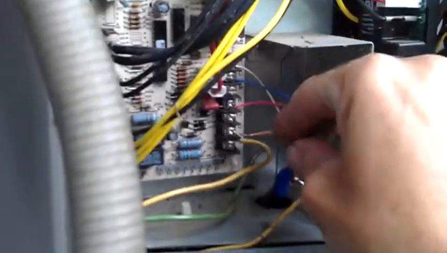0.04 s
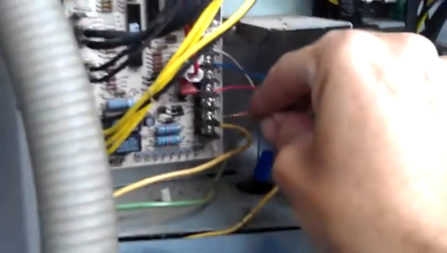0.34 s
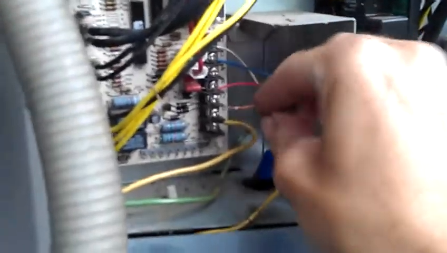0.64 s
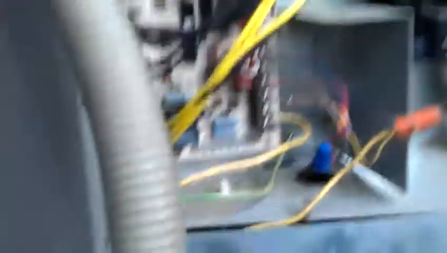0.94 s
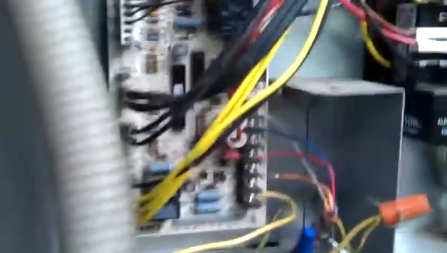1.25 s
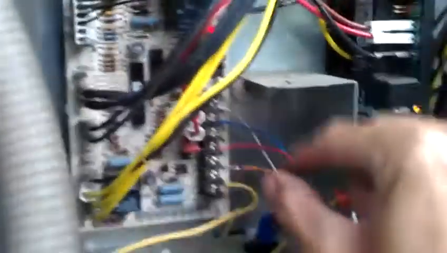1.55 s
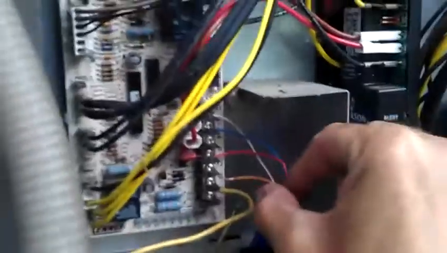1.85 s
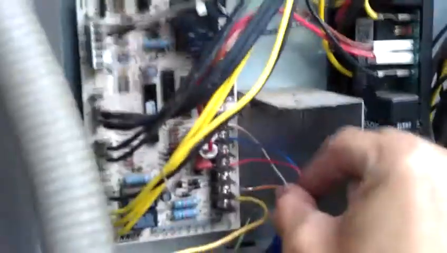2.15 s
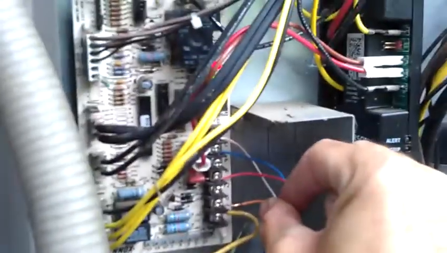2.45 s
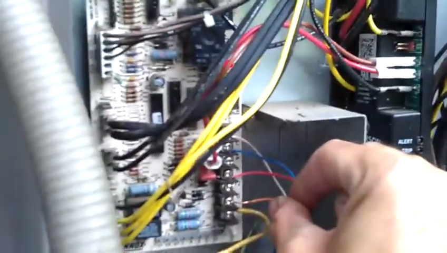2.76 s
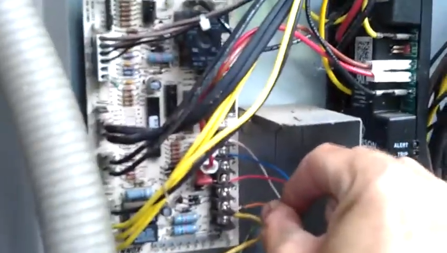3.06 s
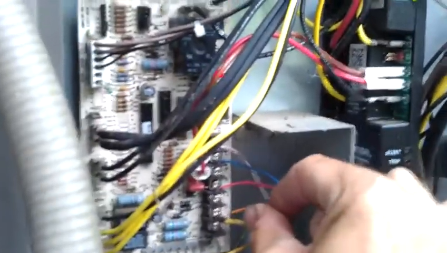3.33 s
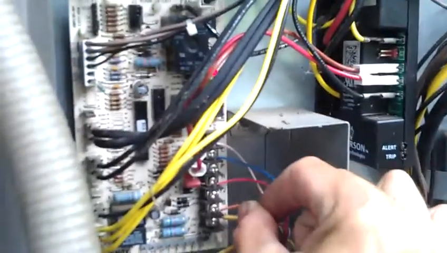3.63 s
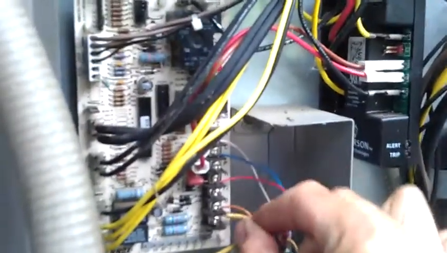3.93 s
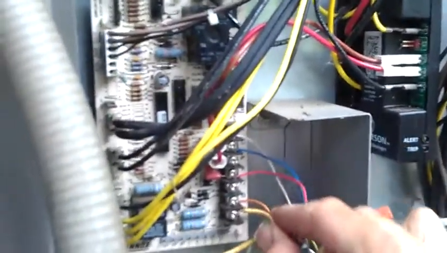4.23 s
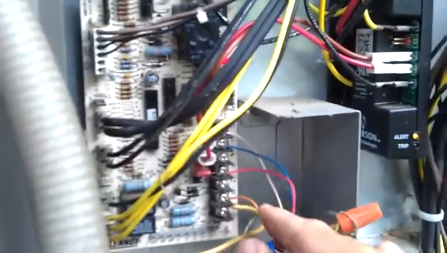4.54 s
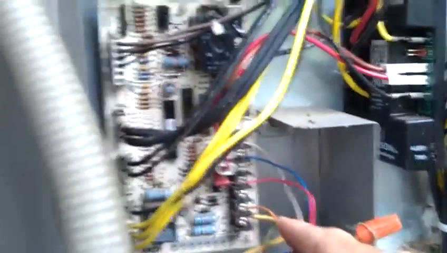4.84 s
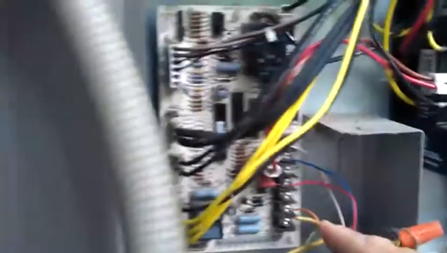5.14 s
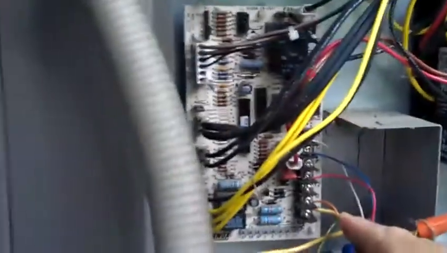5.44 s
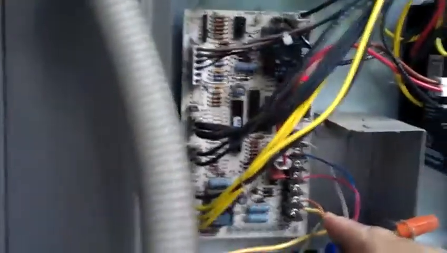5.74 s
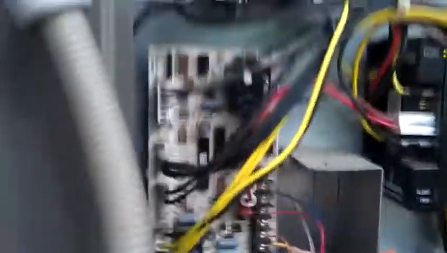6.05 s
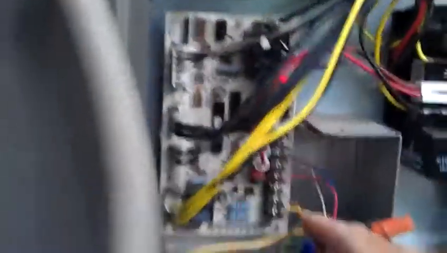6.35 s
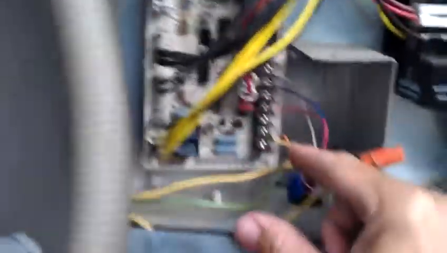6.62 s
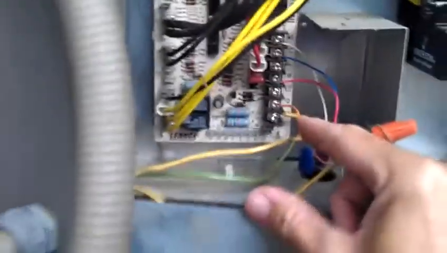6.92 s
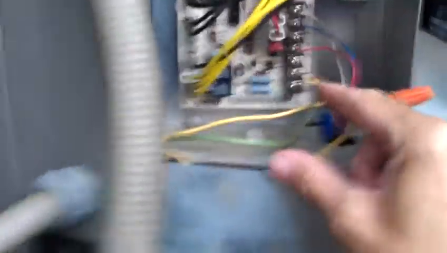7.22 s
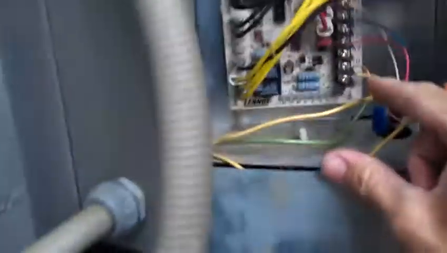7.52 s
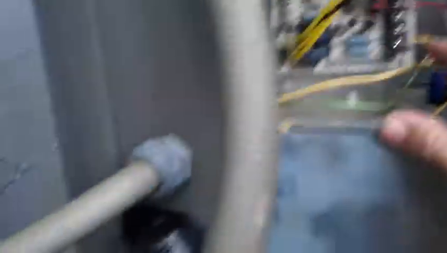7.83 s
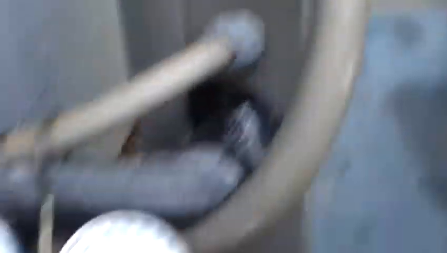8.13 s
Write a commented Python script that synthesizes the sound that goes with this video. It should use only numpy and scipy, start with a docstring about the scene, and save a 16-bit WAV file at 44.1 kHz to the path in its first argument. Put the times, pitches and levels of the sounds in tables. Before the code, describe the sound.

A heat pump hums, a wire clicks on a terminal, then a valve hisses and gas rushes as the compressor knocks and throbs.

```python
"""Outdoors, beside a heat pump with its service panel off: compressor hum, mains hum and fan air.
A thermostat wire is touched to its terminal with sharp clicks. Gas hisses through a small pilot valve,
then the slide of the reversing valve shifts and gas rushes the other way through the pipes.
The compressor then labours: each turn puffs gas into the ringing pipes and makes its discharge valve
ping, some turns knock, and the pipes throb with a whine."""
import sys
import numpy as np
from scipy import signal
from scipy.fft import rfft, irfft, next_fast_len
from scipy.io import wavfile

SR = 44100
rng = np.random.default_rng(int(sys.argv[2]) if len(sys.argv) > 2 else 0)


def store_pcm(level_fs):
    """Save levels as 16-bit WAV."""
    pcm = np.round(np.clip(level_fs, -1, 1) * 32767).astype(np.int16)
    wavfile.write(sys.argv[1], SR, np.atleast_2d(pcm).T)


N = 360738
T = np.arange(N) / SR
IDLE_HZ, LOADED_HZ, MAINS_HZ = 59.02, 59.71, 60   # turns a second, idle and under load; the mains
# When the pilot valve opens, the slide breaks loose, the flow reverses and the compressor settles.
PILOT_S, SLIDE_S, REVERSE_S, SETTLED_S = 2.68, 3.56, 3.932, 6.73
STROKE_S = 6.405   # one stroke of the compressor; the others lie whole turns away
LOAD_DB_PER_S = 229   # how fast the compressor takes up the load
CUTOFF_HZ = 14050


# Tone colours of the gas flow and of the metal clack. Each row: frequency in Hz, level in dB.
FLOW_COLOUR = [(60, -35), (500, -18), (850, -12.5), (1400, -9.5), (1750, -10), (2650, -3), (3250, -12),
               (4800, -4.5), (6500, 0), (8600, -8.5), (9700, -19), (11500, -12.5), (14000, -28.5)]
CLACK_COLOUR = [(500, -37), (2500, -18), (3400, -17), (4000, -3), (4950, -24), (5400, -14), (6400, 2),
                (9000, -1.5), (14000, -45)]
# Where the pipes and the clack ring. Each row: frequency in Hz, width in Hz, boost in dB.
PIPE_PEAKS = [(1170, 210, 7.5), (1482, 95, 13.5), (1850, 125, 7.5), (2620, 200, -8), (2990, 110, 6),
              (3130, 110, -1), (3340, 83, 6), (3980, 140, 6), (4360, 220, 3.5), (5060, 100, 4),
              (5210, 140, 5), (5720, 110, 3.5), (5950, 65, 4.5), (6360, 54, 5), (6610, 47, -6),
              (7480, 120, 6.5), (8700, 110, 10), (10800, 250, 1)]
CLACK_PEAKS = [(2860, 66, 11), (3970, 110, -5)]
# Pure notes of the pipes. Each row: multiple of the turn rate, level in dB.
RING_NOTES = [(8, -48), (9, -54.5), (12, -55.5), (13, -47), (14, -45), (15.5, -43), (16, -39.5),
              (16.5, -41), (17, -49), (18, -40.5), (18.5, -41), (21, -36.5), (21.5, -43), (26, -38.5),
              (26.5, -46), (40, -40)]
# How those notes swell and fade. Each row: time in seconds, relative level in dB.
RING_LEVEL = [(4.35, -22), (4.99, -31), (6.98, -26), (7.81, -27), (8.15, -24)]

def compressor(knock_db=4.5, flow_db=-24, buzz_db=-13, clack_db=-36, hard_clack_db=-4, throb=0.84):
    """Every turn sends a puff of gas through the ringing pipes; on some turns it knocks hard."""
    settled = stage(SETTLED_S, rise_db_per_s=5)
    pressure_db = 1.54 * (np.minimum(T, SETTLED_S) - REVERSE_S)   # the flow grows as pressure builds
    lull_db = 0.5 * sum(bump(s - 0.013, 0.0092) for s, _ in hard_knocks())   # just before a hard knock
    waver_db = 0.5 * drift(12) * (T < SETTLED_S)
    flow = load() * from_db(pressure_db - lull_db + waver_db)
    puffs, knocks = strokes(rise_s=0.0043, decay_s=0.0087, uneven_db=2)
    puffs = rms_one(0.48 + puffs)   # some gas flows between the puffs
    pipe_level = np.hypot(from_db(flow_db) * flow * puffs, from_db(knock_db) * knocks)
    pipes = pipe_level * (noise(FLOW_COLOUR, PIPE_PEAKS) + from_db(buzz_db) * settled * buzz())
    # each stroke opens with a short metallic clack
    taps, hard_taps = strokes(rise_s=0.0017, decay_s=0.0024, uneven_db=3.5)
    clack_level = np.hypot(from_db(clack_db) * flow * taps, from_db(hard_clack_db) * hard_taps)
    clacks = clack_level * noise(CLACK_COLOUR, CLACK_PEAKS)
    ring_level = load() * settled * relative_gain(RING_LEVEL) * (1 + throb * (puffs - 1))
    ringing = ring_level * tones(LOADED_HZ, RING_NOTES, waver_db=2.5, wander=0.0099)
    return pipes + clacks + ringing


def strokes(rise_s, decay_s, uneven_db):
    """Two loudness curves: the puffs that come once a turn, and the knocks."""
    puffs = strike(since_stroke(), rise_s, decay_s) * from_db(uneven_db * drift(43))
    knocks = np.zeros(N)
    for s, db in all_knocks():
        where, shape = impact(s, rise_s, decay_s)
        knocks[where] += from_db(db) * shape
    return rms_one(puffs), knocks


# Runs of hard knocks. Each row: start in seconds, number of knocks, turns between them, level in dB.
KNOCK_RUNS = [(4.444, 1, 1, -23), (4.513, 2, 3, -18), (4.646, 2, 2, -20), (4.747, 1, 1, -14),
              (4.813, 1, 1, -12.5), (4.848, 1, 1, -21), (4.948, 1, 1, -10), (5.031, 2, 2, -11),
              (5.132, 5, 3, -12), (5.4, 2, 3, -12), (5.517, 5, 4, -10), (5.887, 1, 1, -10),
              (5.985, 2, 2, -11), (6.255, 1, 1, -7), (6.406, 1, 1, -8.5)]

def hard_knocks():
    """The compressor knocks while the pressures swap; gives each knock's time and level."""
    return [(s + k * turns / LOADED_HZ, db) for s, count, turns, db in KNOCK_RUNS for k in range(count)]


# Strokes that still stand out once the compressor has settled, as times in seconds.
LIGHT_KNOCKS = [6.741, 6.823, 6.858, 6.941, 7.208, 7.293, 7.393, 7.511, 7.578, 7.694, 7.711, 7.829, 7.93,
                8.114]

def all_knocks(rebound_db=-5, light_db=-14):
    """The hard knocks, a weaker rebound one turn after each, and the later light knocks."""
    hard = hard_knocks()
    rebounds = [(s + 1 / LOADED_HZ, db + rebound_db) for s, db in hard]
    return hard + rebounds + [(s, light_db) for s in LIGHT_KNOCKS]


# Notes of the discharge valve. Each row: frequency in Hz, level in dB, fade time in seconds.
PING_NOTES = [(2880, -6, 0.0026), (3000, 0, 0.0034), (3580, -9, 0.0078), (4000, -8.5, 0.0043),
              (4460, -8, 0.0065), (4840, -4, 0.0068), (4920, -6.5, 0.0068), (5310, -7, 0.005),
              (5720, -3.5, 0.0069), (5960, -11, 0.0096), (6200, -14, 0.0054), (6540, -11, 0.0083),
              (6540, -5, 0.0061), (6780, -9, 0.0088), (7000, -14, 0.005), (7530, -6, 0.0045)]
# How loud the pings are. Each row: time in seconds, level in dB.
PING_LEVEL = [(4.0, -31), (4.8, -31.5), (5.9, -34), (6.38, -24), (6.46, -22), (7.1, -21), (7.55, -22),
              (7.8, -23), (7.92, -23), (8.15, -22.5)]

def pings(uneven_db=1.2, knock_db=-15, wobble_s=0.00025, rise_s=0.001):
    """The discharge valve slaps shut once a turn, harder on a knock, and rings briefly."""
    turns = np.arange(np.ceil((REVERSE_S - STROKE_S) * LOADED_HZ), (T[-1] - STROKE_S) * LOADED_HZ)
    times = STROKE_S + turns / LOADED_HZ
    level_chance, time_chance = rng.standard_normal((len(times), 2)).T
    levels = from_db(curve(PING_LEVEL, times) + uneven_db * level_chance)
    for s, db in all_knocks():
        nearest = np.argmin(np.abs(times - s))
        levels[nearest] = np.hypot(levels[nearest], from_db(db + knock_db))
    out, age = np.zeros((2, N + SR)), T[:SR // 25]
    rings, phases = [], []
    for hz, db, decay_s in PING_NOTES:
        shape = strike(age, rise_s, decay_s)
        rings.append(from_db(db) * shape / shape.max() * np.exp(2j * np.pi * hz * age))
        phases.append(stereo(*random_phases(len(times)), hz))
    # every slap adds up the same notes with fresh phases
    slaps = (np.stack(phases, axis=-1) @ np.array(rings)).real
    for k, s in enumerate(times + wobble_s * time_chance):
        first = int(s * SR)
        out[:, first:first + len(age)] += levels[k] * slaps[:, k]
    return out[:, :N]


# How loud the whine is. Each row: time in seconds, level in dB.
WHINE_LEVEL = [(4.0, -34), (4.5, -33.5), (5.0, -27), (5.9, -29.5), (6.25, -23), (6.6, -29), (7.0, -28),
               (7.5, -25), (7.85, -23), (8.15, -22.5)]
# Its two swells in every turn. Each row: seconds after the stroke, width in seconds, height.
WHINE_SWELLS = [(0.0083, 0.0033, 0.7), (0.0143, 0.0022, 0.41)]

def whine(multiple=24.5, limp=0.91, uneven_db=1.8):
    """The strokes drive the pipes' main note in throbs; its pitch is ragged until the load settles."""
    turns = LOADED_HZ * (T - STROKE_S)
    ragged = np.interp(T, [SETTLED_S - 0.5, SETTLED_S], [0.94, 0.27]) * drift(15)
    phase = 2 * np.pi * multiple * turns + limp * np.sin(np.pi * turns) + ragged   # odd, even turns differ
    swells = sum(height * np.exp(-((since_stroke() - s) / width_s) ** 2)
                 for s, width_s, height in WHINE_SWELLS)
    throb = rms_one(0.15 + swells)
    level = from_db(curve(WHINE_LEVEL) + uneven_db * drift(22)) * load()
    return np.sqrt(2) * level * throb * stereo(np.sin(phase), np.cos(phase), multiple * LOADED_HZ)


# Notes of the shell's hum. Each row: multiple of the turn rate, level in dB.
HUM_NOTES = [(3, -48), (4, -48.5), (5, -45), (6, -54), (7, -53.5), (8, -61.5)]
# How its lowest note and its rumble swell and fade. Each row: time in seconds, level in dB.
DRONE_LEVEL = [(4.1, -47.5), (4.6, -52.5), (6.4, -49), (7.1, -68), (7.6, -52), (7.95, -42)]
RUMBLE_LEVEL = [(4.35, -36.5), (4.5, -35), (6.04, -33.5), (6.08, -39), (6.18, -30.5), (6.91, -52),
                (7.5, -37.5), (7.83, -31.5), (8.15, -34.5)]   # only its swings count, widened by rumble_swing
# Tone colours of the rumble and the thuds. Each row: frequency in Hz, level in dB.
RUMBLE_COLOUR = [(40, -61), (85, -33), (135, -2), (290, -2), (400, -9.5), (620, -8.5), (900, -2),
                 (1800, -24)]
THUD_COLOUR = [(50, -57), (95, -35), (130, -23), (200, 0), (300, 12), (600, -15), (1500, -13)]

def shell(hum_db=1.5, rumble_db=-39, rumble_swing=1.77, thud_db=-22, note_db=-23, note_hz=133.6):
    """The compressor's heavy shell hums and rumbles under load, and thuds with each hard knock."""
    hum = from_db(hum_db) * tones(LOADED_HZ, HUM_NOTES, waver_db=3, wander=0.0047)
    drone = from_db(curve(DRONE_LEVEL)) * tones(LOADED_HZ, [(2, 0)], waver_db=2, wander=0.004)
    rumble_level = relative_gain(RUMBLE_LEVEL) ** rumble_swing * from_db(rumble_db + 2 * drift(46))
    rumble = rumble_level * noise(RUMBLE_COLOUR, [(449, 17, 14.4)])
    heaves = sum(from_db(db) * bump(s - 0.0012, 0.013) for s, db in hard_knocks())
    phase = 2 * np.pi * note_hz * T
    note = from_db(note_db) * stereo(np.sin(phase), np.cos(phase), note_hz)
    thuds = heaves * (from_db(thud_db) * noise(THUD_COLOUR) + note)
    return load() * (hum + drone + rumble) + thuds


# Tone colour of the buzz. Each row: frequency in Hz, level in dB.
BUZZ_COLOUR = [(300, -57), (700, -13), (1050, 2), (1400, -20), (1800, -14), (2400, -8), (3200, -14),
               (7000, -34)]

def buzz():
    """The shell repeats the same shake every second turn, which makes many closely spaced notes."""
    period = round(2 * SR / LOADED_HZ)
    hz = frequencies(period)
    mid, side = from_db(at_hz(BUZZ_COLOUR, hz)) * random_phases(len(hz))
    cycle = rms_one(irfft(stereo(mid, side, hz), period))
    return cycle[:, np.arange(N) % period]


# Tone colours of the leak and the jet. Each row: frequency in Hz, level in dB.
LEAK_COLOUR = [(300, -60), (2000, -24), (3800, -15.5), (5400, -15), (6500, -3.5), (7700, -9), (8800, 1),
               (9700, -8), (10600, 0), (12500, -9), (14000, -12)]
JET_COLOUR = [(60, -67), (400, -8.5), (800, -10.5), (1500, -8.5), (2700, -7), (4300, -1.5), (6800, -2),
              (9500, 4.5), (10500, -4), (11600, 1), (14000, -14)]
# Where each of them rings. Each row: frequency in Hz, width in Hz, boost in dB.
LEAK_PEAKS = [(5100, 450, 3.5), (6100, 160, 6.8), (6680, 450, 11.8), (7650, 280, 4), (10650, 280, 7.5),
              (11500, 200, 6), (14000, 200, 7)]
JET_PEAKS = [(4900, 170, 6.1), (6830, 600, 16.3), (9100, 320, 5.3), (11350, 380, 8.6)]
# Moments when the jet chokes, in seconds.
JET_CHOKES = [4.478, 4.706, 4.797, 4.93]

def reversing_valve(leak_db=-26.5, burst_db=-13, jet_db=-19, flutter_db=1.94):
    """Gas leaks through the pilot valve, bursts out as the slide breaks loose, then jets past it."""
    sag_db = 7 * bump(SLIDE_S + 0.13, 0.032)   # the leak sags after the burst
    leak = from_db(leak_db - sag_db) * stage(PILOT_S, rise_db_per_s=3000, hold_s=1.64, fall_db_per_s=30)
    burst = from_db(burst_db) * bump(SLIDE_S, 0.026)
    choke_db = 5 * sum(bump(s, 0.014) for s in JET_CHOKES)
    jet = from_db(jet_db - choke_db) * stage(REVERSE_S, rise_db_per_s=48, hold_s=0.66, fall_db_per_s=8.5)
    hiss = (leak + burst) * noise(LEAK_COLOUR, LEAK_PEAKS) + jet * noise(JET_COLOUR, JET_PEAKS)
    return hiss * from_db(flutter_db * drift(24))


def slide(groan_db=-49, peak_s=3.9, swell_s=0.09):
    """The valve's slide groans faintly as it travels."""
    return from_db(groan_db) * bump(peak_s, swell_s) * breathy(hz=430, width_hz=45)


# Tone colour of the howl. Each row: frequency in Hz, level in dB.
HOWL_COLOUR = [(60, -38), (130, -6), (300, 2), (600, -5.5), (1200, -7.5), (2000, -3.5), (2700, -13),
               (4200, 2.5), (6000, -38)]
# Where it rings. Each row: frequency in Hz, width in Hz, boost in dB.
HOWL_PEAKS = [(1535, 68, 17), (1908, 82, 18.6), (4220, 200, 6.9)]

def pipe_howl(howl_db=-29):
    """The first gulp of reversed gas makes the emptied pipe howl; it fades as the pressures settle."""
    shape = stage(REVERSE_S - 0.01, rise_db_per_s=1000, hold_s=0.24, fall_db_per_s=8)
    return from_db(howl_db) * shape * noise(HOWL_COLOUR, HOWL_PEAKS)


# Tone colour of the roar. Each row: frequency in Hz, level in dB.
ROAR_COLOUR = [(400, -56), (700, -11.5), (820, 2), (1000, -4), (1250, 0), (1600, -11.5), (2600, -24)]
# Where it rings. Each row: frequency in Hz, width in Hz, boost in dB.
ROAR_PEAKS = [(860, 76, 9.6), (1526, 88, 18)]
# How loud it is between knocks. Each row: time in seconds, level in dB.
ROAR_LEVEL = [(4.3, -38.5), (4.74, -36), (5.3, -33.5), (6.05, -35), (6.25, -31), (6.42, -35), (6.5, -56),
              (7.2, -37), (8.15, -38)]

def pipe_roar(surge_db=8.5, tone_db=-51):
    """Gas roars in the pipes, surging at each hard knock; a faint tone sounds as the pressures swap."""
    level = from_db(curve(ROAR_LEVEL)) * load()
    surges = from_db(surge_db * sum(bump(s + 0.0073, 0.02) for s, _ in hard_knocks()))
    tone_level = from_db(tone_db) * stage(4.53, rise_db_per_s=40, hold_s=1.1, fall_db_per_s=27)
    tone = tone_level * tones(LOADED_HZ, [(10.5, 0)], waver_db=6, wander=0.0081)
    return level * surges * noise(ROAR_COLOUR, ROAR_PEAKS) + tone


# Whistles. Each row: loudest moment in seconds, width in seconds, pitch in Hz, level in dB.
WHISTLES = [(5.78, 0.33, 4010, -34.5), (8.1, 0.1, 4000, -33), (8.1, 0.25, 1278, -29)]

def pipe_whistles(width_hz=22):
    """Now and then the gas makes a pipe sing on one airy note."""
    return sum(from_db(db) * bump(s, width_s) * breathy(hz, width_hz) for s, width_s, hz, db in WHISTLES)


# Wire and finger clicks. Each row: start in seconds, level in dB, pitch in Hz, fade time in seconds.
CLICKS = [(0.755, -26.5, 2020, 0.0062), (1.536, -3, 4350, 0.0046), (1.537, -18.5, 1560, 0.0047),
          (1.628, -27, 1590, 0.0056), (1.719, -30, 4750, .006), (2.297, -20, 3500, 0.0038)]
# Gas spurts. Each row: start in seconds, level in dB, fade time in seconds, depth of the dip after in dB.
SPURTS = [(2.673, -3, 0.0083, 9), (2.979, -3, 0.002, 6), (2.9903, -9, 0.016, 19),
          (3.1562, 3.5, 0.0034, 8.5), (3.488, 6, 0.0041, 14), (3.841, -15.5, 0.025, 14),
          (4.084, -13.5, 0.015, 21), (4.227, -12, 0.011, 17.5), (4.256, -12.5, 0.0047, 14)]
# Where the control box rings. Each row: frequency in Hz, width in Hz, boost in dB.
BOX_PEAKS = [(3730, 91, 0.5), (4370, 240, -5), (4620, 230, 3), (5940, 260, 0), (6850, 640, 3.5),
             (7980, 530, 5.5), (10600, 170, -14), (12100, 270, 7)]

def clicks_and_spurts(boost_db=3, spurt_hz=8170, tail_db=-21):
    """The wire and the valve make short cracks that ring in the control box and echo in the cabinet."""
    box, out = noise([(100, 0), (14000, 0)], BOX_PEAKS), np.zeros((2, N))
    spurts = [(s, db, spurt_hz, decay_s) for s, db, decay_s, _ in SPURTS]
    for s, db, hz, decay_s in list(CLICKS) + spurts:
        where, crack = impact(s, rise_s=0.00057, decay_s=decay_s)
        _, tail = impact(s, rise_s=0.0053, decay_s=0.023)
        b, a = signal.iirpeak(hz, Q=1.09, fs=SR)
        band = signal.lfilter(b, a, box[:, where])
        colour = rms_one(signal.lfilter(b, a, band + 0.53 * box[:, where]))
        out[:, where] += from_db(db + boost_db) * colour * (crack + from_db(tail_db) * tail)
    return out


def dips(lag_s=0.0084, db_per_s=987):
    """The level dips briefly after each spurt; a deeper dip comes later and lasts longer."""
    return from_db(-sum(db * bump(s + lag_s + db / db_per_s, db / db_per_s) for s, _, _, db in SPURTS))


# Notes of the touched metal. Each row: start in seconds, pitch in Hz, level in dB.
TERMINAL_RINGS = [(0.757, 2090, -25), (1.536, 3602, -11), (1.536, 4045, -14), (1.536, 4452, -9.5),
                  (1.536, 5780, -12), (1.629, 1400, -27), (2.297, 3600, -23)]

def terminal():
    """The terminal and wire ends ring briefly when they are touched."""
    out = np.zeros((2, N))
    for s, hz, db in TERMINAL_RINGS:
        where, shape = impact(s, rise_s=0.00034, decay_s=0.0052)
        mid, side = np.sin(2 * np.pi * (hz * T[where] + rng.random((2, 1))))
        out[:, where] += from_db(db) * shape * stereo(mid, side, hz)
    return out


# Notes of the idling compressor and of the mains. Each row: multiple of the base rate, level in dB.
IDLE_NOTES = [(7, -44), (9, -53.5), (11, -70), (12, -55.5), (13, -55.5), (14, -43.5), (15, -47.5),
              (16, -57), (17, -42.5), (18, -47.5), (19, -52), (20, -58), (21, -47), (22, -49.5),
              (24, -54.5), (31, -52.5)]
MAINS_NOTES = [(2, -43), (3, -53), (6, -47)]
# Tone colour of the fan's air. Each row: frequency in Hz, level in dB.
FAN_COLOUR = [(40, -61), (85, -19.5), (150, -7), (265, -3), (400, -2.5), (530, -7.5), (680, -6.5),
              (900, -5.5), (1600, -10), (3000, -12), (6000, -14.5), (8800, -11.5), (9700, -15),
              (10900, -12), (14000, -24)]

def idling(fan_db=-30.5, hushed_db=-46, loaded_db=-16):
    """Compressor and mains hum over the air of the fan; hushed as the slide moves, faint under load."""
    fade_out = from_db(hushed_db * np.clip((T - SLIDE_S - 0.012) / 0.095, 0, 1))
    fade_back = from_db(loaded_db) * stage(REVERSE_S, rise_db_per_s=92)
    shaft = tones(IDLE_HZ, IDLE_NOTES, waver_db=1.34, wander=0.0009)
    mains = tones(MAINS_HZ, MAINS_NOTES, waver_db=-0.5, wander=0)
    fan = from_db(fan_db) * noise(FAN_COLOUR, [(264, 64, 7.3)])
    return (fade_out + fade_back) * (shaft + mains + fan)


def hush(x, depth_db=13, lag_s=0.016, close_s=0.022, back_db_per_s=110, edge_hz=4700):
    """As the slide breaks loose, all but the high hiss drops away, then swells back."""
    age = T - SLIDE_S - lag_s
    recovered_db = back_db_per_s * np.maximum(age - close_s, 0)
    drop_db = np.clip(age / close_s, 0, 1) * np.maximum(depth_db - recovered_db, 0)
    lows = signal.sosfiltfilt(signal.butter(4, edge_hz, fs=SR, output="sos"), x)
    return x - lows * (1 - from_db(-drop_db))


def cut_deep_bass(x, edge_hz=88):
    """The deepest bass is taken out of the compressor's sounds."""
    return signal.sosfilt(signal.butter(4, edge_hz, "high", fs=SR, output="sos"), x)


# Bands that the cabinet weakens. Each row: frequency in Hz, width in Hz, level change in dB.
HOLLOWS = [(2678, 98, -5), (3220, 124, -11), (3790, 92, -6), (5260, 116, -8)]

def cabinet(x):
    """Echoes inside the cabinet cancel a few narrow bands, which makes the sound hollow."""
    for hz, width_hz, depth_db in HOLLOWS:
        b, a = signal.iirnotch(hz, hz / width_hz, fs=SR)
        x = from_db(depth_db) * x + (1 - from_db(depth_db)) * signal.lfilter(b, a, x)
    return x


# Echoes between the cabinet walls. Each row: round trip in seconds, ripple in the treble in dB.
WALL_ECHOES = [(0.00262, 1), (0.00437, 1), (0.0075, 1.95)]

def noise(colour, peaks=(), echo_share=0.94):
    """The stereo rush of swirling gas, with a broad tone colour and ringing peaks on top."""
    size = next_fast_len(N)
    hz = frequencies(size)
    peaks_db = sum(boost / (1 + (2 * (hz - centre) / width) ** 2) for centre, width, boost in peaks)
    ripple_db = np.clip(hz / 4000, 0, 1) * sum(db * np.cos(2 * np.pi * hz * s) for s, db in WALL_ECHOES)
    gain = from_db(at_hz(colour, hz) + peaks_db + ripple_db) * (hz < CUTOFF_HZ)
    mid, side = rfft(rng.standard_normal((2, size))) * gain
    # part of what differs between the ears is the same sound, thrown back by nearby panels
    panels = rfft(rng.standard_normal(SR // 200) * (T[:SR // 200] > 0.001), size)
    side = np.sqrt(echo_share) * mid * panels / np.abs(panels) + np.sqrt(1 - echo_share) * side
    out = irfft(stereo(mid, side, hz), size)[:, :N]
    return out / out.mean(axis=0).std()


def tones(base_hz, notes, waver_db, wander):
    """Pure notes on multiples of one rate: each wavers in level, and all wander in pitch together."""
    out, turns = 0, base_hz * T + wander * drift(0.86)
    for multiple, db in notes:
        phase = 2 * np.pi * (multiple * turns + rng.random())
        level = from_db(db + waver_db * drift(8))
        out = out + level * stereo(np.sin(phase), np.cos(phase) * rng.choice([-1, 1]), multiple * base_hz)
    return np.sqrt(2) * out


def breathy(hz, width_hz):
    """A narrow band of stereo noise around one note."""
    phase = 2 * np.pi * hz * T
    mid, side = [drift(width_hz) * np.sin(phase) + drift(width_hz) * np.cos(phase) for _ in range(2)]
    return stereo(mid, side, hz)


# How alike the two ears are. Each row: frequency in Hz, likeness from -1 (opposite) to 1 (the same).
EAR_LIKENESS = [(60, 0.79), (130, 0.83), (280, 0.91), (610, -0.67), (1340, 0.45), (2900, 0.2), (6300, 0.27),
                (13700, 0.18)]
# How the sound leans left. Each row: frequency in Hz, left minus right in dB.
LEFT_LEAN = [(60, -37), (110, 10), (200, 2), (370, 4.5), (670, 5.5), (1230, 2.5), (2240, 7), (4100, 7),
             (7490, 4.5), (13700, 9.5)]

def stereo(mid, side, hz):
    """Spread two unrelated signals over the ears, with the likeness and lean of that frequency."""
    alike, lean = at_hz(EAR_LIKENESS, hz), from_db(at_hz(LEFT_LEAN, hz) / 2)
    mid, side = np.sqrt(1 + alike) * mid, np.sqrt(1 - alike) * side
    return np.array([(mid + side) * lean, (mid - side) / lean]) / np.sqrt(1 + alike)


def since_stroke():
    """Seconds since the last stroke of the loaded compressor."""
    return (T - STROKE_S) % (1 / LOADED_HZ)


def load():
    """Gain that climbs to 1 as the compressor takes up the load."""
    return stage(REVERSE_S, LOAD_DB_PER_S)


def stage(full_s, rise_db_per_s, hold_s=10, fall_db_per_s=0):
    """Gain that climbs during the second before full_s, holds at 1 and then fades."""
    early_s, late_s = np.clip(full_s - T, 0, 1), np.maximum(T - full_s - hold_s, 0)
    return from_db(-rise_db_per_s * early_s - fall_db_per_s * late_s)


def strike(age, rise_s, decay_s):
    """The quick rise and fade of something hit."""
    return (1 - np.exp(-age / rise_s)) * np.exp(-age / decay_s)


def impact(start_s, rise_s, decay_s):
    """One hit: the samples it covers and its loudness curve."""
    first = int(start_s * SR)
    age = T[:min(SR // 4, N - first)]
    return slice(first, first + len(age)), strike(age, rise_s, decay_s)


def bump(s, width_s):
    """A smooth hill of height 1 around a moment."""
    return np.exp(-np.minimum(((T - s) / width_s) ** 2, 20))


def drift(rate, step=100):
    """A smooth random wobble of size about 1, changing about rate times a second."""
    pole = np.exp(-2 * np.pi * step * rate / SR)
    chance = rng.standard_normal(N // step + 1002)
    slow = signal.lfilter([1], [1, -2 * pole, pole * pole], chance)[1000:]
    return np.interp(np.arange(N) / step, np.arange(len(slow)), rms_one(slow))


def random_phases(count):
    """Two rows of random starting points for waves, as complex numbers."""
    return np.exp(2j * np.pi * rng.random((2, count)))


def frequencies(size):
    """The frequencies in Hz in the spectrum of that many samples, never below 1."""
    return np.maximum(np.arange(size // 2 + 1) * SR / size, 1)


def curve(rows, times=T):
    """Join a table's points in time with straight lines."""
    return np.interp(times, *np.transpose(rows))


def relative_gain(rows):
    """A level curve as a gain, relative to its average level."""
    db = curve(rows)
    return from_db(db - db.mean())


def at_hz(rows, hz):
    """Read between a table's frequencies, with every octave equally wide."""
    row_hz, values = np.transpose(rows)
    return np.interp(np.log(hz), np.log(row_hz), values)


def from_db(db):
    """Decibels to gain."""
    return 10 ** (np.asarray(db) / 20)


def rms_one(x):
    """Scale to an average strength (rms) of 1."""
    return x / np.sqrt(np.mean(x ** 2) + 1e-20)


def scene():
    """Gas and machine with their brief dips, coloured by the cabinet, and the clicks on top."""
    gas = reversing_valve() + slide() + pipe_howl() + pipe_roar() + pipe_whistles()
    machine = idling() + whine() + pings() + cut_deep_bass(compressor() + shell())
    return cabinet(hush(dips() * (gas + machine))) + clicks_and_spurts() + terminal()


def record(dry):
    """The loudest peaks are rounded and the highest treble is cut."""
    rounded = 1.017 * np.tanh(dry / 1.155)
    return signal.sosfilt(signal.ellip(12, 0.2, 80, CUTOFF_HZ, fs=SR, output="sos"), rounded)


dry = scene()
out = record(dry)
store_pcm(out)
```